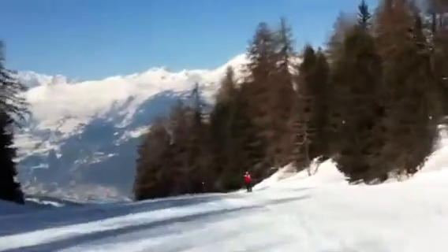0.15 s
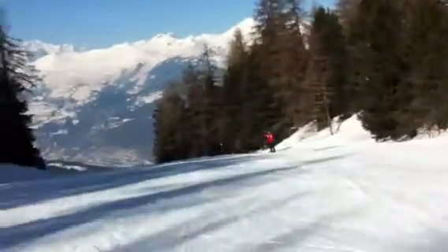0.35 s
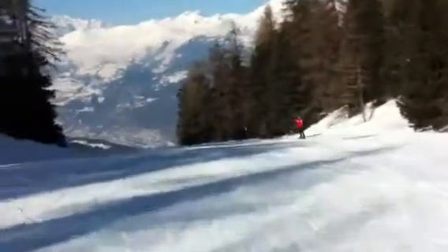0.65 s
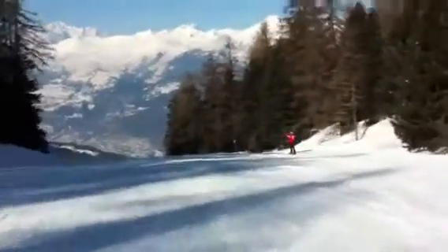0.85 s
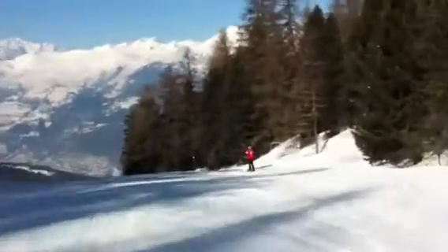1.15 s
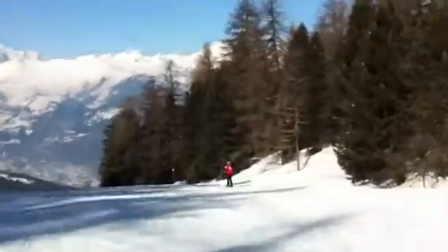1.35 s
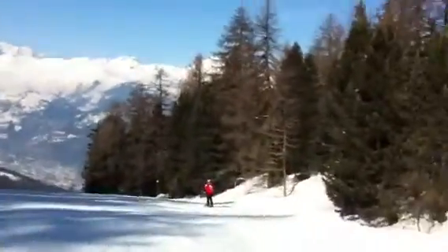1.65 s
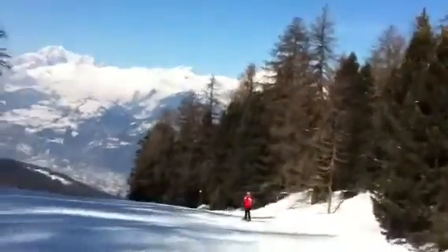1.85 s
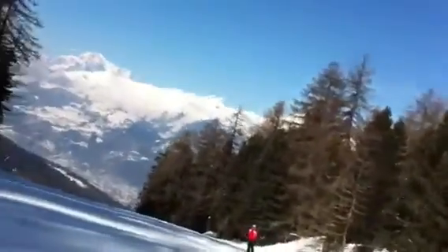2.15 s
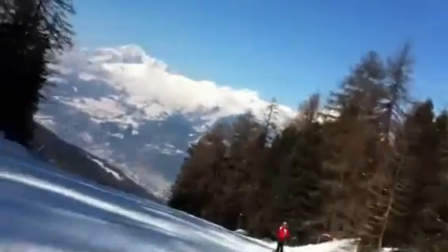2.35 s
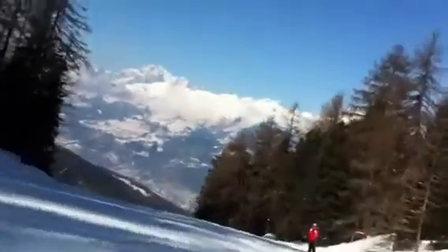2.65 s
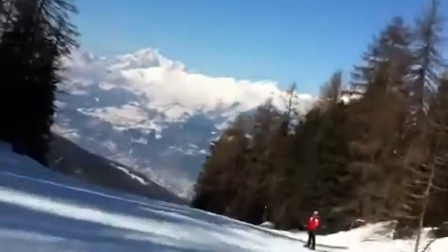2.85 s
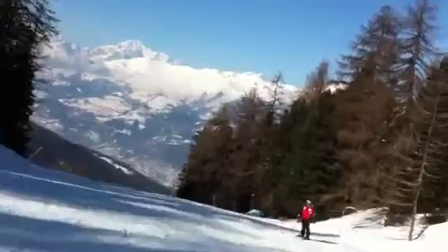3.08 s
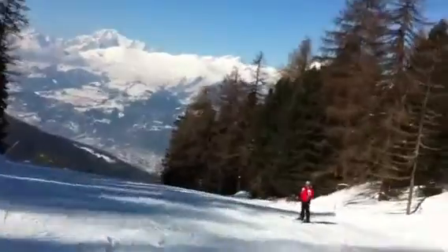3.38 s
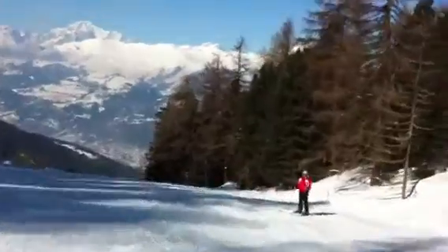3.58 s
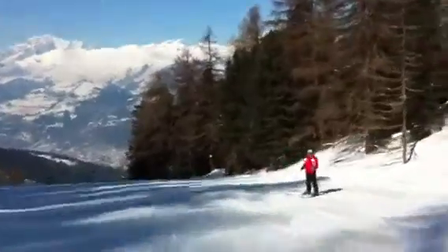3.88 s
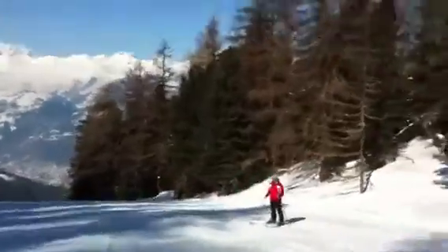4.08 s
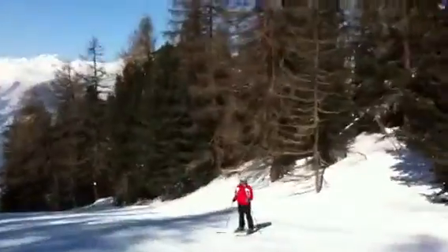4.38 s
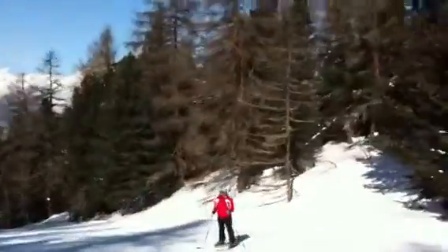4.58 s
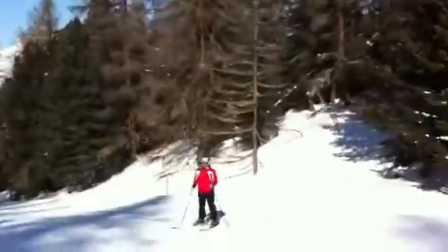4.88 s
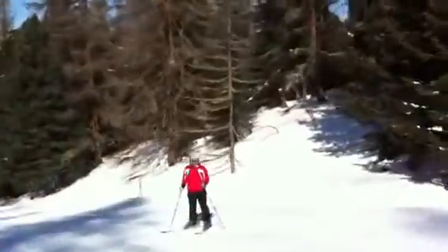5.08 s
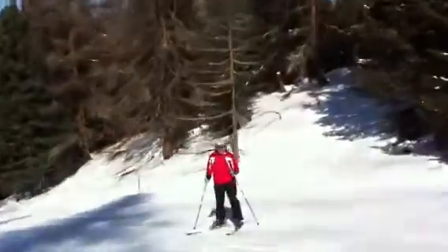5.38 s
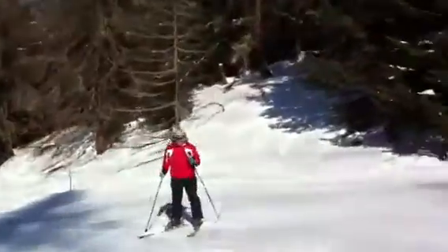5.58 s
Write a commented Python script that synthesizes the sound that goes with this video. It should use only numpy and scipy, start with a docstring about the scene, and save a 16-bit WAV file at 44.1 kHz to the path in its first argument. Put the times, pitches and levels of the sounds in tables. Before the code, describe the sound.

Skis scrape and hiss over packed snow while lumpy wind thumps the microphone, easing to a quiet glide before a rough skidding finish.

```python
"""Ski run from a hand-held camera

Close, dry perspective on an open slope: a skier glides down packed snow with a small mono camera in hand.
The bases hiss and the steel edges scrape, both as shaped noise of snapping snow grains; lumps of crust
crunch as short grain clusters. Carved turns ring the ski, and the run ends in a broad skid of coarse clods.
Head wind whistles briefly as unsteady tones. On the microphone port it is a lumpy low flutter, with thumps
made of trains of pressure pushes."""
import sys
import numpy as np
from scipy import signal
from scipy.fft import rfft, irfft, next_fast_len
from scipy.io import wavfile
from scipy.ndimage import uniform_filter1d, map_coordinates

SR = 44100
rng = np.random.default_rng(int(sys.argv[2]) if len(sys.argv) > 2 else 0)


def output_pcm(signal):
    """Save a mono or channel-first signal as 16-bit PCM at the path in sys.argv[1].

    Samples are clipped to [-1, 1] before scaling.
    """
    pcm = np.clip(np.atleast_2d(signal).T, -1, 1) * 32767
    wavfile.write(sys.argv[1], SR, np.round(pcm).astype(np.int16))


N = 252648

# steady gliding, louder with speed and load, before gain:
# (time [s], hiss of the bases [dB], scrape of the edges [dB])
GLIDE = [(0.0, -45.5, -40.5), (0.85, -39, -31.5), (1.02, -38.5, -31.5), (1.23, -43.5, -39),
         (1.61, -48, -43.5), (1.82, -52, -46), (2.06, -49.5, -53.5), (2.39, -44.5, -38),
         (2.76, -46.5, -45.5), (2.97, -44.5, -42.5), (3.14, -41.5, -34), (3.29, -46, -35.5),
         (3.99, -50, -48.5), (4.24, -49.5, -47), (5.11, -42, -33), (5.22, -37.5, -30), (5.38, -41, -33),
         (5.73, -45, -38)]
HISS_GAIN_DB = 4
# the skier's weight digs the edges in and throws powder:
# (time [s], length [s], scrape level [dB], spray level [dB])
DIGS = [(0.273, 0.07, -30.5, -36.5), (0.45, 0.035, -32, -39), (0.568, 0.036, -33.5, -35),
        (0.76, 0.029, -33, -34), (1.09, 0.13, -35, -42), (2.056, 0.18, -42, -45.5),
        (2.232, 0.12, -33, -35.5), (2.498, 0.059, -38, -40.5), (2.667, 0.1, -38.5, -40.5),
        (2.898, 0.034, -37, -42), (3.79, 0.06, -41, -64), (3.924, 0.062, -48, -45.5),
        (5.104, 0.039, -27.5, -35), (5.228, 0.1, -31.5, -36.5), (5.455, 0.17, -33, -40)]
DIG_ATTACK_S, DIG_RELEASE_S = 0.016, 0.2  # rise, and fall by 60 dB
# the skis go light over a roll and the gliding sinks: (time [s], length [s], depth [dB])
LULLS = [(1.772, 0.073, 4), (1.99, .03, 2.5), (2.42, 0.046, 3), (2.783, .03, 0), (3.873, 0.054, 2.5),
         (4.087, 0.071, 5.5), (4.366, 0.059, 1), (4.573, 0.044, 3.5), (4.802, 0.23, 3.5)]
LULL_ATTACK_S, LULL_RELEASE_S = 0.012, 0.12  # sinking in, and coming back
HISS_LULL_SHARE = 0.66  # the bases keep more of their sound in a lull than the edges
# spectrum of the edges' scrape: (frequency [Hz], level [dB])
SCRAPE_SPECTRUM = [(100, -27.5), (250, 0), (450, 3), (700, 2.5), (1000, 2.5), (1220, 4), (1500, -0.5),
                   (1850, -1.5), (2150, -7.5), (3200, -8.5), (4200, -13), (5200, -15), (8000, -22),
                   (16000, -35)]
# uneven snow: depth, width and life of the patches in the scrape
PATCH_DB, PATCH_WIDTH_HZ, PATCH_S = 1.54, 409, 0.014
# spectrum of the bases' hiss and the spray: (frequency [Hz], level [dB])
POWDER_SPECTRUM = [(600, -47), (1800, 2), (3000, 1), (4350, 1.5), (5100, 3.5), (6500, 3), (8000, 1.6),
                   (10300, 1.5), (13000, 1), (16000, -1)]

# head wind on the port, before gain: (time [s], level [dB])
WIND = [(0.0, -43.5), (0.22, -41.5), (0.43, -40.5), (0.69, -37.5), (0.91, -36.5), (1.05, -37.5),
        (1.17, -36), (1.26, -44.5), (1.45, -44), (1.65, -51), (1.9, -44), (2.28, -44.5), (2.47, -39.5),
        (2.57, -37.5), (2.68, -37), (2.8, -53), (2.87, -38), (3.13, -42), (3.42, -49), (3.65, -51),
        (4.2, -51.5), (4.64, -48.5), (5.25, -45), (5.57, -47), (5.73, -49)]
WIND_GAIN_DB = 2.9
# gusts that swell the flutter: (time [s], length [s], level [dB])
GUSTS = [(.2, 0.062, -37), (.275, 0.066, -30.5), (.385, 0.031, -30), (.435, 0.034, -36),
         (.55, 0.0075, -27.5), (.694, 0.02, -27), (.918, 0.025, -30), (1.037, 0.018, -31),
         (1.19, 0.031, -38), (1.684, 0.024, -42.5), (1.8, 0.063, -38), (2.042, 0.014, -33.5),
         (2.126, 0.048, -32), (2.325, 0.021, -29.5), (2.387, 0.017, -32), (2.435, 0.012, -33),
         (2.5, 0.076, -35.5), (2.735, 0.03, -37), (2.9, 0.088, -33.5), (3.04, 0.039, -29.5),
         (3.096, 0.027, -40), (3.152, 0.01, -29.5), (3.32, 0.021, -29.5), (3.365, 0.013, -35),
         (3.48, 0.023, -37), (3.655, 0.037, -38.5), (3.721, 0.024, -39), (3.868, 0.018, -42),
         (3.942, 0.027, -45), (4.012, .014, -43), (4.171, 0.021, -42), (4.24, 0.013, -47),
         (4.39, 0.035, -41.5), (4.668, 0.014, -44), (4.721, .012, -40), (5.016, 0.021, -36.5)]
GUST_ATTACK_S, GUST_RELEASE_S = 0.0026, 0.055  # rise, and fall by 60 dB
LUMPS_DB, SURGE_DB = 0.9, 1.93  # depths of the flutter's quick random lumps and slower surges
# spectrum of the flutter on the port: (frequency [Hz], level [dB])
BUFFET_SPECTRUM = [(20, -50), (40, -43), (60, -26), (90, -12), (125, -2.5), (170, 1), (240, -2.5),
                   (330, -6), (450, -12), (700, -22.5), (1500, -50), (4000, -70)]
# spectrum of the steady air under the flutter: (frequency [Hz], level [dB])
AIR_SPECTRUM = [(20, -46), (45, -28), (70, -17), (110, -5), (170, -13.5), (300, -13), (600, -29),
                (1500, -52)]
RUSH_DB = -54

# two thin whistling tones (rising, sinking) and a short low hoot, each a list of
# (time [s], pitch [Hz], level [dB], flutter [0-1])
WHISTLES = [
    [(.028, 958, -40, 0), (.06, 1000, -35, .1), (.085, 946, -43, .15), (.112, 1080, -36, .2),
     (.128, 1065, -42, .3)],
    [(.165, 1405, -46, .9), (.205, 1410, -31.5, 0.55), (.24, 1380, -33.5, .4), (.285, 1335, -31, 0.33),
     (.315, 1288, -36, .1), (.335, 1222, -34, 0.1), (.365, 1207, -27.5, 0), (.395, 1240, -35, 0.08)],
    [(3.43, 310, -40, 0.58), (3.47, 304, -37, 0.2), (3.52, 278, -37, 0.5)],
]
WHISTLE_FADE_S, WHISTLE_BEAT_HZ = 0.08, 37.7
FRAY_HZ = 230  # random knots a second; sets the width of the airy band round a whistle

# eddies that hit the port, before gain:
# (time [s], rms level [dB], length [s], nominal centre [Hz])
THUMPS = [(0.284, -29, 0.007, 210), (0.302, -29, 0.009, 433), (0.622, -29, 0.009, 247),
          (0.652, -29, 0.008, 400), (0.709, -23.5, 0.005, 330), (0.741, -22.5, 0.008, 420),
          (0.753, -26, 0.007, 280), (0.784, -22.5, 0.0057, 480), (0.791, -18, 0.0066, 320),
          (0.829, -21, 0.014, 206), (0.845, -24.5, 0.014, 250), (0.974, -19.5, 0.0043, 340),
          (0.988, -28, 0.023, 235), (1.097, -24, 0.02, 235), (1.137, -30, 0.012, 368),
          (1.2, -30, 0.017, 267), (1.295, -30.5, 0.019, 230), (1.382, -29, 0.011, 178),
          (1.493, -26, 0.025, 310), (1.577, -30, 0.0062, 200), (1.855, -25, 0.024, 247),
          (1.879, -25, 0.014, 230), (2.425, -16.5, 0.0047, 270), (2.458, -31, 0.005, 220),
          (2.49, -20.5, 0.0083, 226), (2.512, -20.5, 0.0048, 450), (2.521, -22, 0.007, 215),
          (2.543, -21.5, 0.008, 249), (2.557, -23, 0.0061, 420), (2.576, -26.5, 0.014, 237),
          (2.628, -17.5, 0.005, 240), (2.639, -23, 0.0056, 476), (2.649, -24.5, 0.0032, 318),
          (2.659, -25, 0.0044, 220), (2.715, -20, 0.01, 270), (2.818, -25.5, 0.0097, 260),
          (2.904, -33, 0.013, 245), (2.986, -32, 0.011, 210), (3.008, -26, 0.0062, 313),
          (3.025, -24, 0.0068, 240), (3.07, -25.5, 0.012, 395), (3.265, -26.5, 0.023, 273),
          (3.444, -33, 0.014, 330), (3.556, -21, 0.0088, 244), (3.581, -28.5, 0.01, 266),
          (3.881, -44, 0.014, 210), (3.944, -40, 0.006, 200), (4.097, -35, 0.008, 200),
          (4.397, -44, 0.014, 190), (4.585, -40, 0.009, 170), (5.021, -30.5, 0.0091, 180)]
THUMP_GAIN_DB, THUMP_PUFF_DB = -1, -12  # gain of the thumps, and the flutter that comes with each
FLAP_S, FLAP_T60_S = 0.0032, 0.033  # typical wait between the pushes of a thump, and their decay
FLAP_SCATTER_DB = 2.5
PORT_HZ, PORT_WIDTH_HZ, PORT_DB = 170, 54, 2.5  # the port's own low ring after a push

# lumps of crust breaking under an edge: (time [s], level [dB], length [s], centre [Hz])
CRUNCHES = [(0.456, -26, 0.0088, 1050), (0.48, -34, 0.01, 1100), (0.671, -31, 0.003, 2940),
            (.672, -31.5, 0.0095, 1120), (0.717, -26, .004, 920), (0.749, -29, 0.0064, 1240),
            (0.783, -26.5, 0.0065, 780), (0.919, -32, .005, 1140), (.946, -31.5, .007, 1090),
            (1.018, -33, .005, 1910), (1.036, -33, 0.0066, 1450), (1.093, -34, .004, 1160),
            (1.13, -28, .006, 617), (1.187, -43, 0.0042, 1010), (1.627, -37.5, 0.0034, 990),
            (1.702, -40, .005, 1450), (1.862, -37.5, 0.015, 754), (2.038, -41.5, 0.013, 1090),
            (2.089, -38.5, 0.015, 1070), (2.17, -34.5, 0.011, 1000), (2.209, -30, 0.0077, 990),
            (2.326, -32, 0.013, 1180), (2.534, -36, 0.0093, 990), (2.639, -39, 0.013, 1050),
            (2.724, -34, .004, 1090), (2.76, -40, 0.0029, 1660), (3.076, -31, 0.0055, 895),
            (3.632, -33.5, 0.0039, 1310), (3.793, -42.5, 0.01, 1120), (4.167, -45.5, 0.017, 1250),
            (4.282, -44.5, .006, 2760), (4.493, -40, 0.0087, 1630), (4.723, -40.5, 0.0087, 1700),
            (4.77, -37, 0.0099, 1210), (4.92, -38.5, 0.02, 1320), (5.021, -33.5, 0.016, 1320),
            (5.07, -29.5, 0.01, 1180), (5.204, -27.5, 0.0074, 537), (5.322, -29, 0.0059, 1620),
            (5.382, -37, 0.0033, 1300), (5.425, -33, 0.0054, 1510)]
CRUNCH_DULL = 2.2  # a lump's sound is damped above this multiple of its centre

# an edge carving on hard snow: (time [s], length [s], level [dB])
CARVES = [(.65, 0.16, -41), (.93, 0.23, -41), (3.095, 0.17, -33.5), (3.33, 0.18, -39.5), (4.46, 0.033, -45),
          (4.69, 0.036, -42), (5.02, 0.13, -38)]
CARVE_ATTACK_S, CARVE_RELEASE_S = 0.011, 0.29  # rise, and fall by 60 dB
# resonances of the carving ski, before damping: (centre [Hz], width [Hz], level [dB])
SKI_MODES = [(1015, 400, 13.5), (2760, 1600, 4), (5120, 860, 2.5), (6460, 1600, -2.5)]
SKI_DAMP_HZ = 6440  # the snow damps the ski's ring above this

# the skis pushed sideways: (time [s], length [s], level [dB])
SKIDS = [(4.74, 0.025, -33.5), (4.9, 0.018, -33), (5.1, 0.26, -35), (5.37, 0.28, -37)]
SKID_ATTACK_S, SKID_RELEASE_S = 0.011, 0.19  # rise, and fall by 60 dB
# spectrum of the ploughed clods: (frequency [Hz], level [dB])
SIDEWAYS_SPECTRUM = [(40, -60), (100, -38), (200, -34), (300, -1.5), (450, 0), (700, -1.5), (1000, -7),
                     (2000, -15), (4000, -45), (9000, -40)]

TOP_HZ = 15950  # band limit of the camera


def amp(db):
    """Decibels to gain."""
    return 10 ** (np.asarray(db) / 20)


def unit(x):
    """Scale to rms 1."""
    return x / np.sqrt(np.mean(x ** 2) + 1e-20)


def steadied(x, span):
    """Noise with its slow swells evened out over span seconds."""
    power = uniform_filter1d(x ** 2, max(int(span * SR), 2))
    return x / np.sqrt(np.abs(power) + 1e-9)


def curves(rows):
    """One value per sample for each column after the time."""
    s, *columns = np.transpose(rows)
    return [np.interp(np.arange(N) / SR, s, column) for column in columns]


def wobble(rate):
    """A smooth random curve, rate knots a second."""
    knots = rng.standard_normal(int(N * rate / SR) + 4)
    return map_coordinates(knots, [np.arange(N) * rate / SR])


def filtered(x, response):
    """x times a response of frequency."""
    m = next_fast_len(len(x) + 8192)
    return irfft(rfft(x, m) * response(np.fft.rfftfreq(m, 1 / SR)), m)[:len(x)]


def coloured(x, spectrum):
    """x shaped by (frequency [Hz], level [dB]) points, at rms 1."""
    f, db = np.transpose(spectrum)
    return unit(filtered(x, lambda hz: amp(np.interp(np.log(hz + 1), np.log(f), db))))


def resonance(hz, centre, width):
    """Response of one damped mode."""
    return 1j * hz * width / (centre ** 2 - hz ** 2 + 1j * hz * width)


def burst(t, length, rise, t60):
    """A quick rise, a hold and a decay."""
    return (1 - np.exp(-t / rise)) * amp(-60 * np.maximum(t - length, 0) / t60)


def add(track, s, sound):
    """Mix a sound into the track at a time."""
    part = track[round(s * SR):][:len(sound)]
    part += sound[:len(part)]


def swells(rows, attack, release):
    """Joint gain of (time [s], length [s], level [dB]) events that each rise, hold and die away."""
    power, t = np.zeros(N), np.arange(SR) / SR
    for s, length, db in rows:
        add(power, s, (amp(db) * burst(t, length, attack, release)) ** 2)
    return np.sqrt(power)


def crystals(rate, spread_db, bed):
    """Snow grains snapping at random moments and sizes, over a bed of countless finer ones."""
    moments = rng.random(N) < rate / SR
    sizes = amp(spread_db * np.clip(rng.standard_normal(N), -2, 2))
    snaps = moments * rng.standard_normal(N) * sizes
    return unit(unit(snaps) + bed * rng.standard_normal(N))


def lulls():
    """Decibels that the gliding loses while the skis are unweighted."""
    t = np.arange(N) / SR
    return sum(depth * burst(np.maximum(t - s, 0), length, LULL_ATTACK_S, LULL_RELEASE_S)
               for s, length, depth in LULLS)


def patchy(x):
    """Each patch of snow favours its own pitches for a moment."""
    z = signal.stft(x, nperseg=256)[2]
    bins, frames = PATCH_WIDTH_HZ * 256 / SR, PATCH_S * SR / 128
    places = np.indices(z.shape) / np.reshape([bins, frames], (2, 1, 1))
    field = map_coordinates(rng.standard_normal(z.shape), places, order=1)
    return unit(signal.istft(z * amp(PATCH_DB * unit(field)))[1][:len(x)])


def edge_scrape(scrape_db, chatter):
    """Steel edges break sparse grains out of patchy snow, harder where they dig in."""
    dig = swells([(s, length, db) for s, length, db, _ in DIGS], DIG_ATTACK_S, DIG_RELEASE_S)
    strength = np.hypot(amp(scrape_db), dig) * amp(0.87 * chatter + 0.33 * wobble(90))
    grains = patchy(crystals(rate=500, spread_db=0.5, bed=1.8))
    return strength * coloured(grains, SCRAPE_SPECTRUM)


def base_hiss(hiss_db, chatter):
    """The bases rub on dense fine grains, and digs throw up a spray of the same powder."""
    spray = swells([(s, length, db) for s, length, _, db in DIGS], DIG_ATTACK_S, DIG_RELEASE_S)
    strength = np.hypot(amp(hiss_db + HISS_GAIN_DB), spray) * amp(chatter)
    return strength * coloured(crystals(rate=6000, spread_db=1.5, bed=2.15), POWDER_SPECTRUM)


def gliding():
    """Edges scrape and bases hiss; lulls lower both, and the uneven snow makes them chatter together."""
    hiss_db, scrape_db = curves(GLIDE) - np.outer([HISS_LULL_SHARE, 1], lulls())
    chatter = 0.86 * wobble(35) + 0.72 * wobble(130)
    return edge_scrape(scrape_db, chatter) + base_hiss(hiss_db, chatter)


def wind():
    """Turbulence on the port: a low, lumpy flutter that follows air speed and gusts, over a steady rush."""
    flutter = steadied(coloured(rng.standard_normal(N), BUFFET_SPECTRUM), span=0.0287)
    rush = amp(RUSH_DB) * coloured(rng.standard_normal(N), AIR_SPECTRUM)
    puffs = [(s, length, db + THUMP_PUFF_DB) for s, db, length, _ in THUMPS]
    gusts = swells([*GUSTS, *puffs], GUST_ATTACK_S, GUST_RELEASE_S)
    strength = np.hypot(amp(curves(WIND)[0] + WIND_GAIN_DB), gusts)
    unrest = amp(LUMPS_DB * wobble(55) + SURGE_DB * wobble(22.08))
    # the flutter thins out below 40 Hz
    return filtered(strength * unrest * flutter, lambda hz: hz ** 2 / (hz ** 2 + 40 ** 2)) + rush


def stroke(rows, fade):
    """Gain of a (time [s], level [dB]) curve that fades to silence outside its span."""
    return amp(curves([(rows[0][0] - fade, -90), *rows, (rows[-1][0] + fade, -90)])[0])


def whistle(rows):
    """An unsteady air tone; the more it flutters, the more of it frays into a narrow, airy band."""
    hz, _, flutter = curves(rows)
    share = np.clip(flutter, 0, 1)
    phase = 2 * np.pi * np.cumsum(hz * (1 + 0.031 * flutter * wobble(202.3))) / SR
    beat = np.sin(2 * np.pi * np.cumsum(WHISTLE_BEAT_HZ * (1 + 0.24 * wobble(43))) / SR)
    air = steadied(wobble(FRAY_HZ) * np.sin(phase) + wobble(FRAY_HZ) * np.cos(phase), span=0.031)
    tone = np.sqrt(2 * (1 - share)) * np.sin(phase) + np.sqrt(share) * air
    level = stroke([(s, db) for s, _, db, _ in rows], WHISTLE_FADE_S)
    return level * (1 + 0.38 * flutter * beat) * tone


def slap(t, centre):
    """One pressure push after the microphone's bass cut: a hollow thud of peak 1 that rings the port."""
    body = lambda hz: resonance(hz, centre, 1.17 * centre) ** 2 / (1 + 1j * hz / 1000)
    port = lambda hz: 1 + amp(PORT_DB) * resonance(hz, PORT_HZ, PORT_WIDTH_HZ)
    bass_cut = lambda hz: 1j * hz * resonance(hz, 109, 110)
    impulse = 1.0 * (t == 0)
    thud = filtered(impulse, lambda hz: body(hz) * port(hz) * bass_cut(hz))
    return thud / np.abs(thud).max()


def thumps():
    """An eddy slaps the port and flaps against it in a quick, uneven train of pushes."""
    out, t = np.zeros(N), np.arange(SR // 10) / SR
    scatter = rng.standard_normal(size=(len(THUMPS), 3, 10))  # ten pushes to a thump
    for (s, db, length, centre), (gaps, sizes, pitches) in zip(THUMPS, scatter):
        waits = FLAP_S * np.exp(0.398 * gaps)
        delays = np.cumsum(waits) - waits[0]
        train = np.zeros(len(t))
        for delay, size, pitch in zip(delays, sizes, pitches):
            fade_db = -60 * max(delay - 0.86 * length, 0) / FLAP_T60_S
            push = slap(t, 0.91 * centre * np.exp(0.15 * pitch))
            add(train, delay, amp(FLAP_SCATTER_DB * size + fade_db) * push)
        # the level is the train's rms, with its energy counted over the thump's length
        train_rms = np.sqrt(np.sum(train ** 2) / (length * SR))
        add(out, s, amp(db + THUMP_GAIN_DB) * train / train_rms)
    return out


def crust():
    """Each lump collapses in a short cluster of grains, coloured by a broad resonance at its centre."""
    out, t = np.zeros(N), np.arange(SR // 8) / SR
    grains = crystals(rate=2000, spread_db=5.5, bed=0.49)
    for s, db, length, centre in CRUNCHES:
        damping = lambda hz: 1 + (hz / (CRUNCH_DULL * centre)) ** 4
        lump = lambda hz: resonance(hz, centre, 0.33 * centre) / damping(hz)
        cluster = steadied(filtered(grains[round(s * SR):][:len(t)], lump), span=0.006)
        # a lump near the end may have fewer grains left than t
        add(out, s, amp(db) * cluster * burst(t[:len(cluster)], length, rise=0.0005, t60=0.035))
    return out


def carving():
    """On edge, the grains ring the ski itself, damped by the snow in the treble."""
    modes = lambda hz: sum(amp(db) * resonance(hz, centre, width) for centre, width, db in SKI_MODES)
    body = lambda hz: modes(hz) / (1 + (hz / SKI_DAMP_HZ) ** 4)
    ring = unit(filtered(crystals(rate=2000, spread_db=9.5, bed=1.6), body))
    return swells(CARVES, CARVE_ATTACK_S, CARVE_RELEASE_S) * amp(0.81 * wobble(110)) * ring


def skidding():
    """Sideways, the skis plough up coarser clods: sparse grains with a low, uneven roar."""
    clods = coloured(crystals(rate=600, spread_db=0.5, bed=0.87), SIDEWAYS_SPECTRUM)
    return swells(SKIDS, SKID_ATTACK_S, SKID_RELEASE_S) * amp(1.4 * wobble(97)) * clods


def scene():
    """Open slope without echoes, one microphone on both channels."""
    air = wind() + sum(whistle(rows) for rows in WHISTLES) + thumps()
    snow = gliding() + crust() + carving() + skidding()
    mono = air + snow
    return np.array([mono, mono])


def record(dry):
    """The camera keeps nothing above its band limit."""
    return np.array([filtered(channel, lambda hz: hz < TOP_HZ) for channel in dry])


dry = scene()
out = record(dry)
output_pcm(out)
```